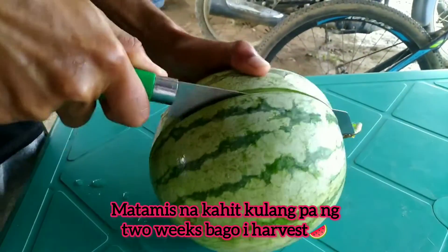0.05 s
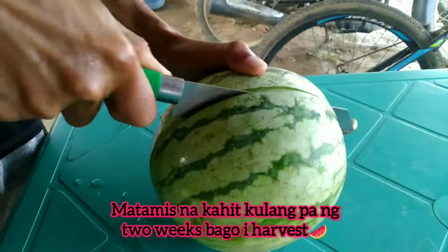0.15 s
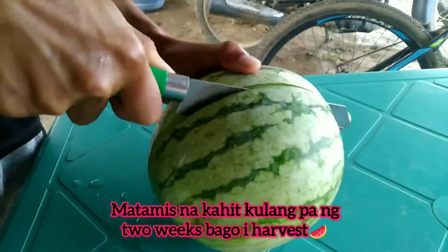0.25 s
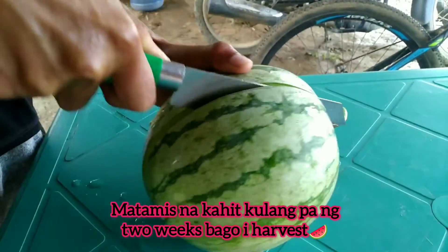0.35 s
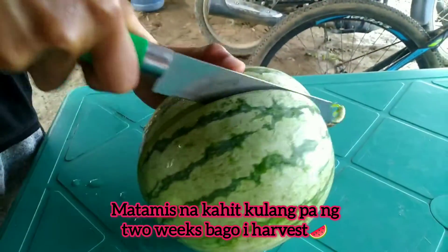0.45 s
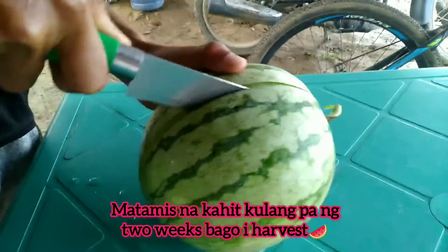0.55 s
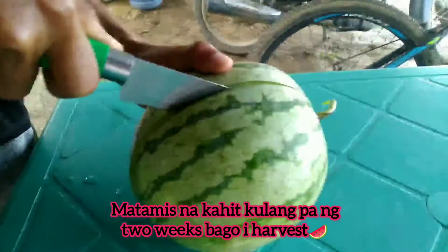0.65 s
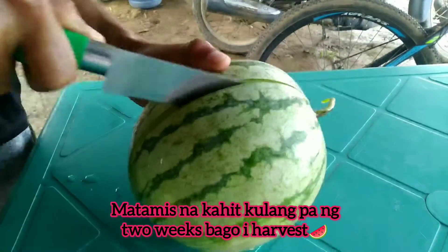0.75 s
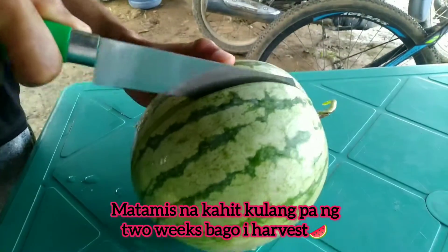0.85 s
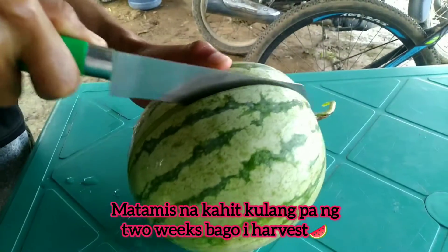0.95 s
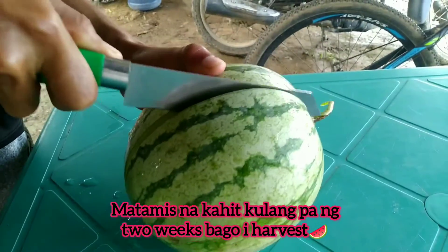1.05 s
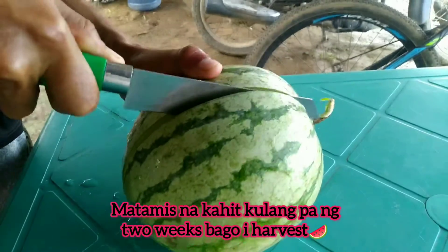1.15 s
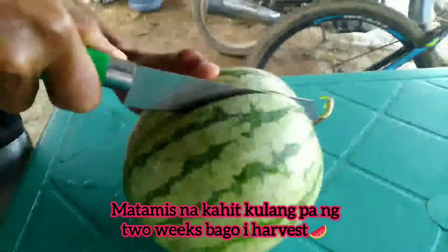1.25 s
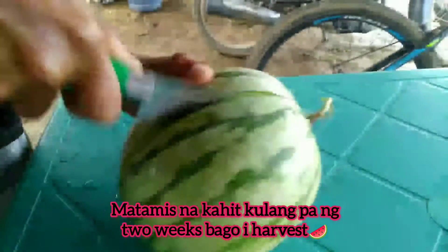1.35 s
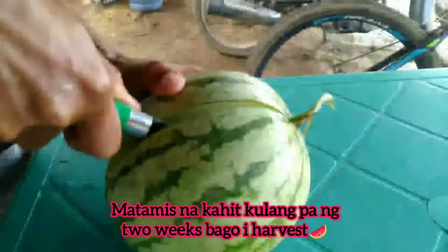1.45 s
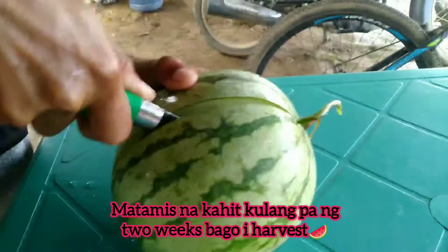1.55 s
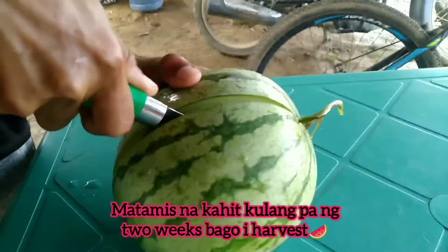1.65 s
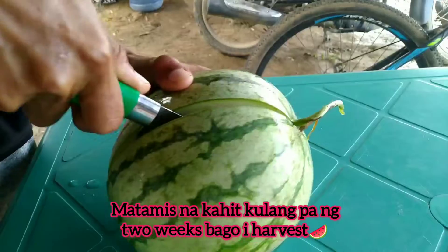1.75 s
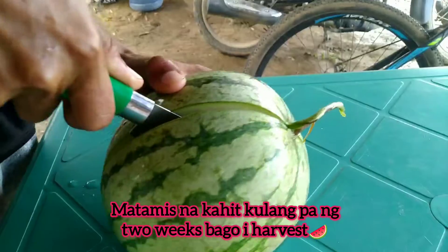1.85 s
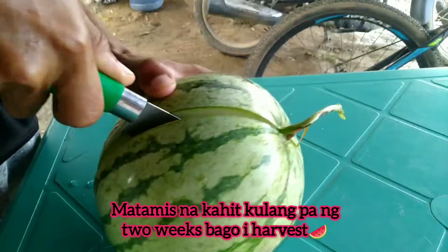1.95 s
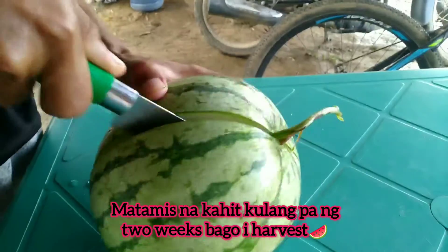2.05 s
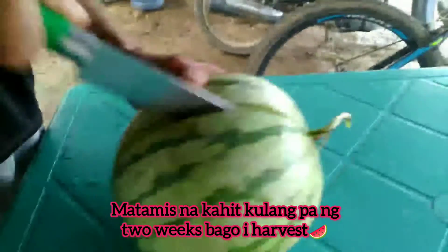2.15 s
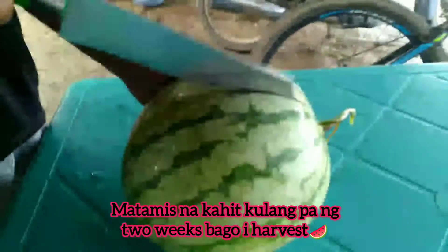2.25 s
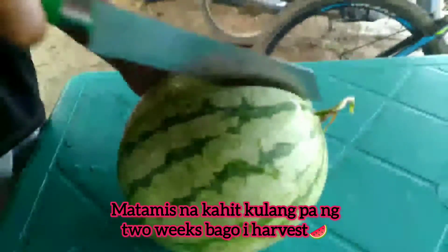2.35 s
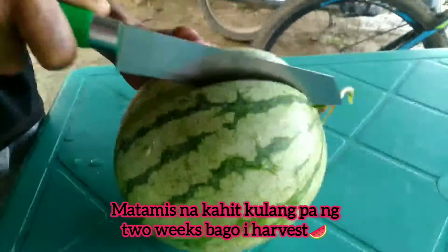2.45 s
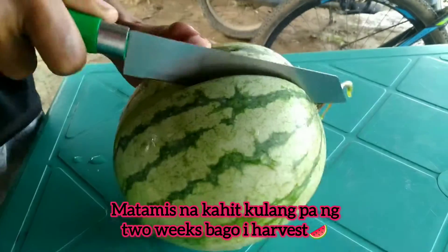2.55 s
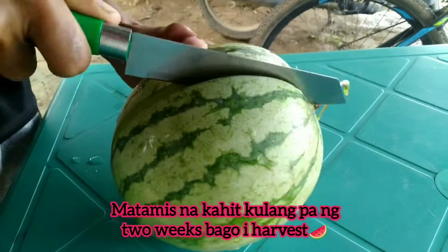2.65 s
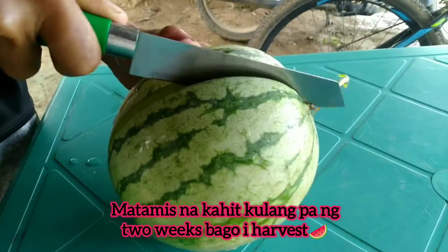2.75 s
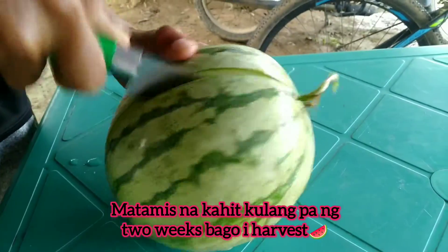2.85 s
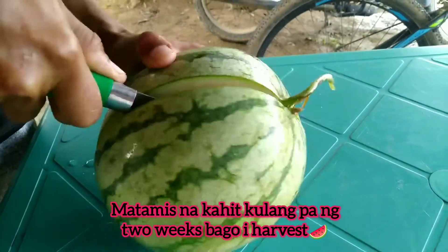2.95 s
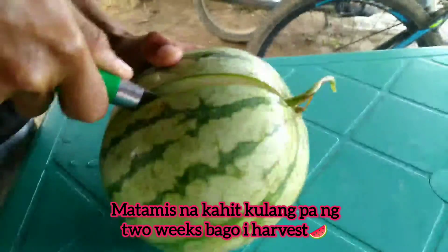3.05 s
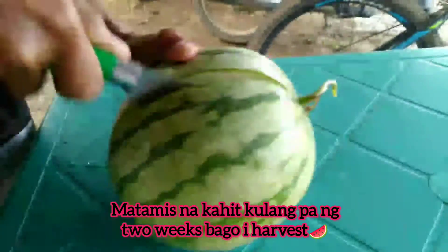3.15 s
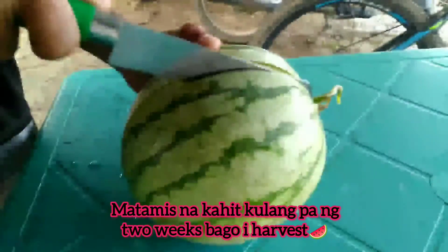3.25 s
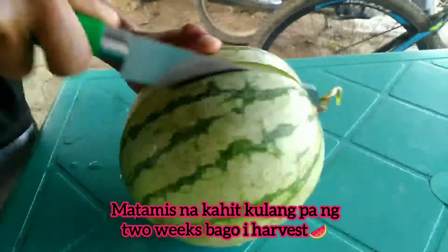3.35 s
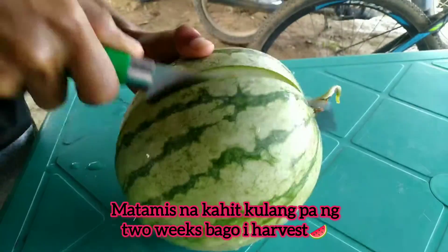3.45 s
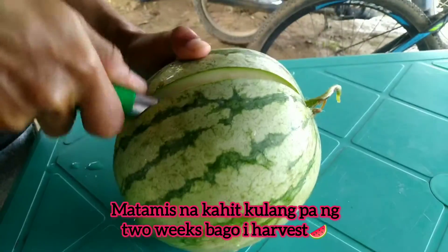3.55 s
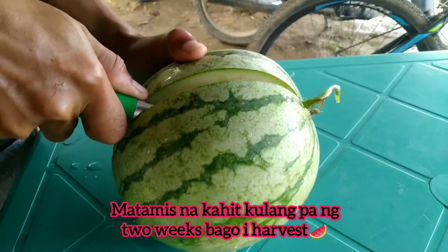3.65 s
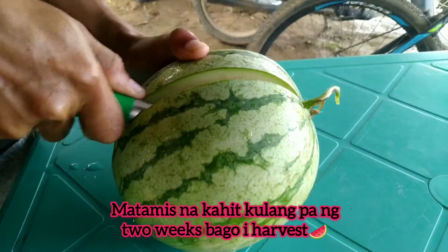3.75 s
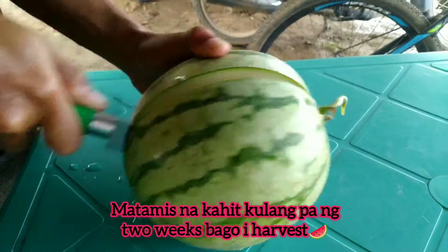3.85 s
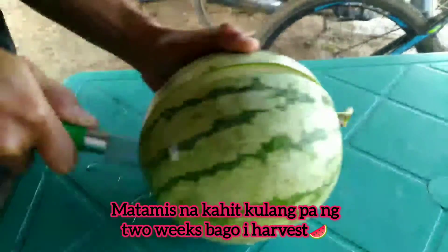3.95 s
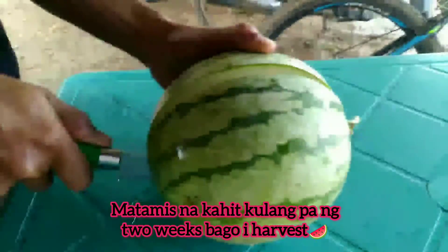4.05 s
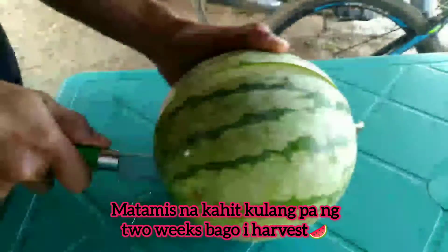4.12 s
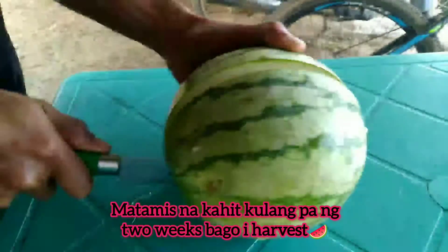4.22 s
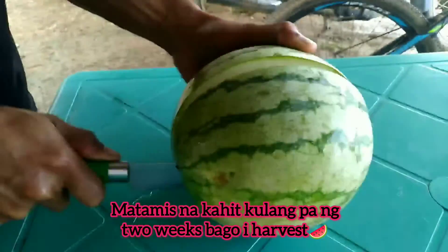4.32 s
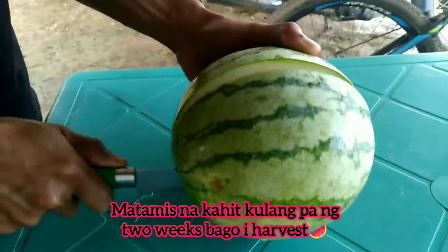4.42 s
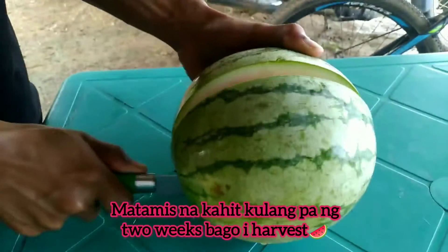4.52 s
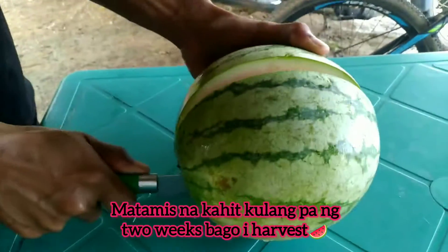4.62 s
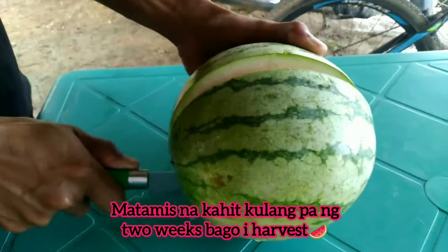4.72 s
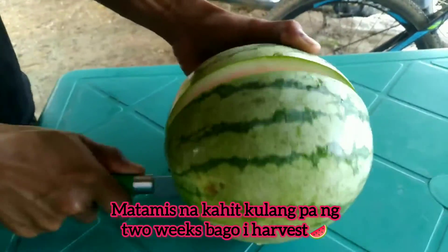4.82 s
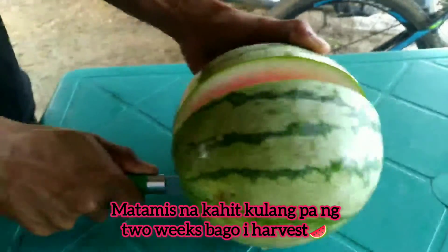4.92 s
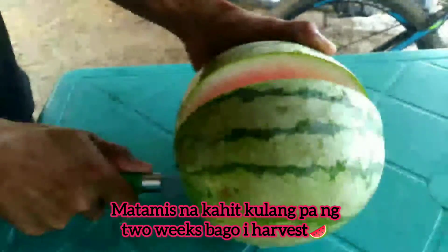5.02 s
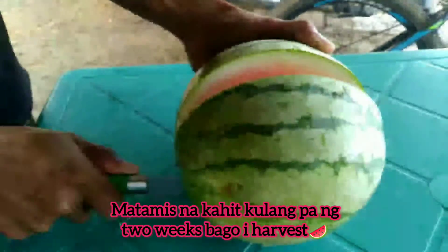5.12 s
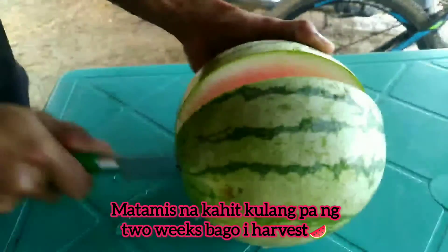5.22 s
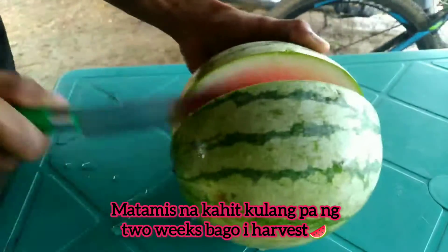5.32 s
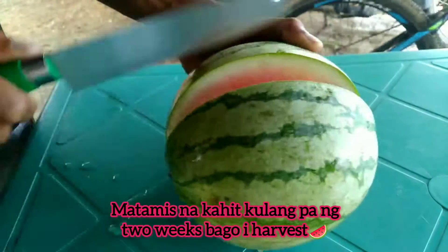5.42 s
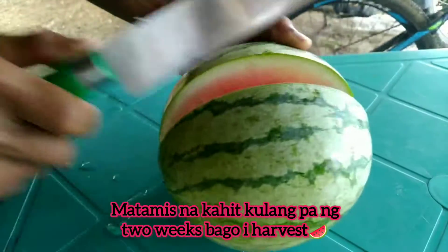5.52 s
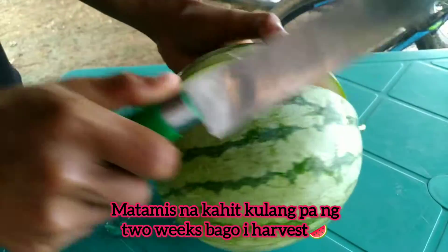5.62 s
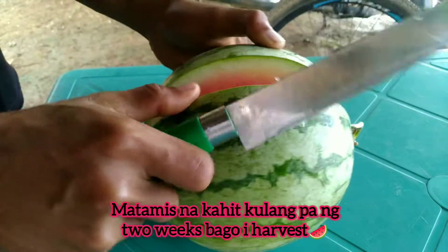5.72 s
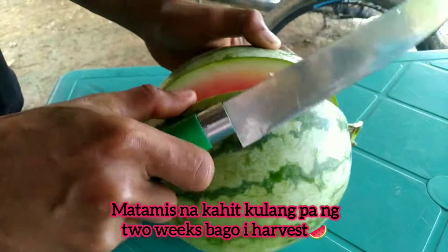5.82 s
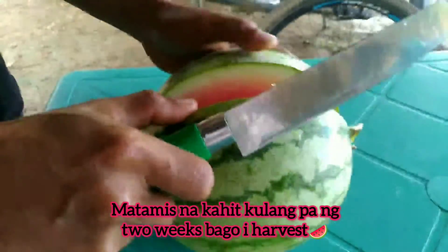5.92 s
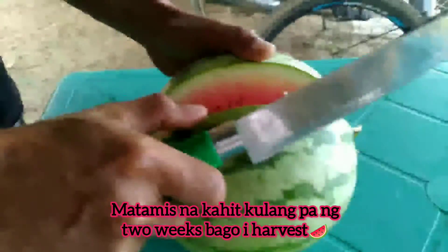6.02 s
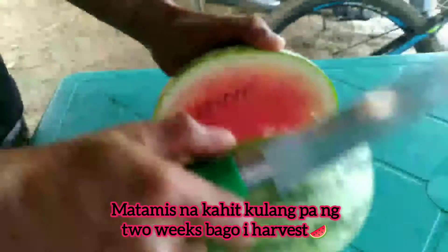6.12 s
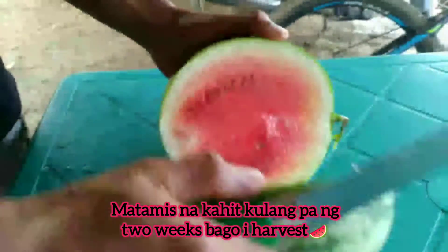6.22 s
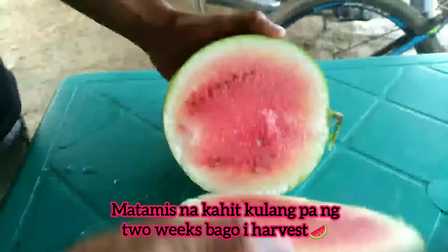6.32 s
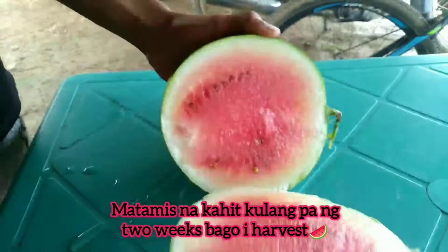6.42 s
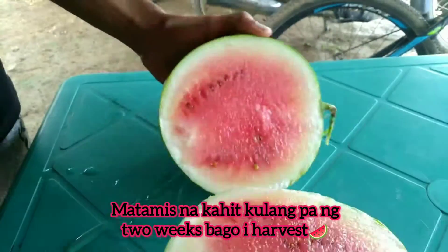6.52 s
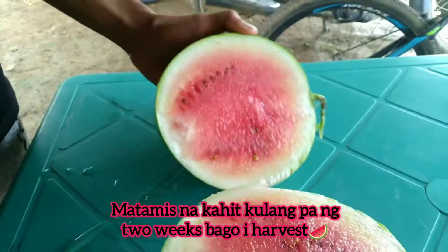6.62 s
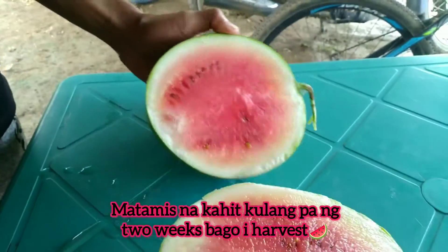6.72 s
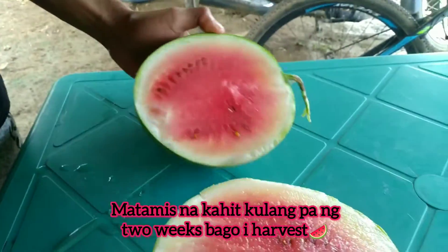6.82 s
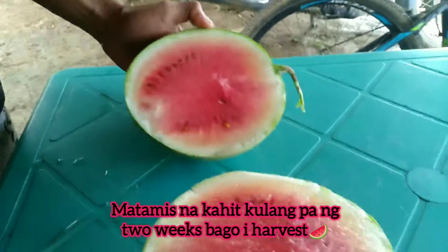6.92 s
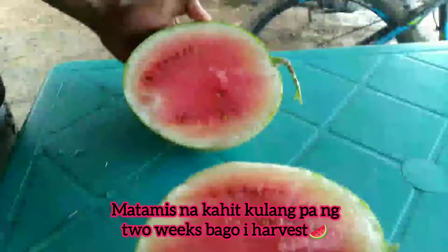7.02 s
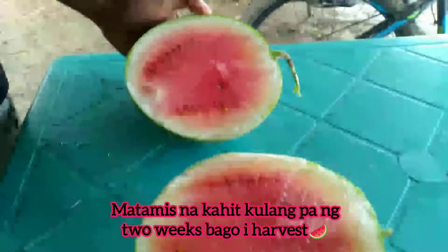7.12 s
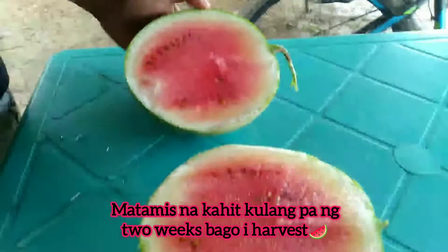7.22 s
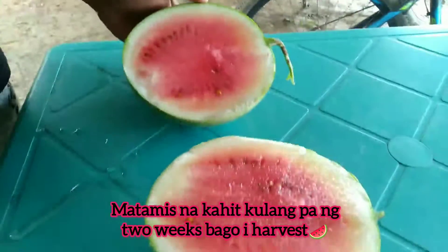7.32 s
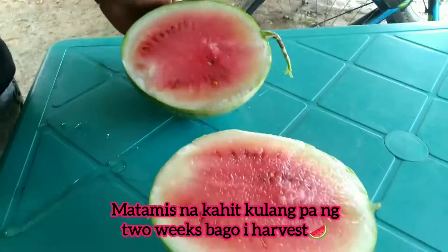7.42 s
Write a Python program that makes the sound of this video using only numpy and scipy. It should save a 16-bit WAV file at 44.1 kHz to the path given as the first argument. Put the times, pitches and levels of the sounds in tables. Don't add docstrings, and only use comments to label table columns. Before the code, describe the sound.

Close up under an open shelter, a knife saws lightly through a watermelon with faint ticks and wet rasps. A sharp crack and hollow thump come early, another juicy tear follows midway, then slower creaking crackles. Near the end the fruit splits in the loudest dense burst of snaps and low thuds, leaving a few tiny ticks. A small engine idles steadily in the distance under faint air hiss.

```python
import sys
import numpy as np
from scipy import signal
from scipy.fft import rfft, irfft, next_fast_len
from scipy.io import wavfile

SR = 44100
rng = np.random.default_rng(int(sys.argv[2]) if len(sys.argv) > 2 else 0)


def voltage_ratio(decibels):
    exponent = np.asarray(decibels, float) / 20
    return 10 ** exponent


def dump_mix(stems):
    frames = np.atleast_2d(stems).T
    limited = np.clip(frames, -1, 1)
    pcm = np.round(limited * 32767).astype(np.int16)
    wavfile.write(sys.argv[1], SR, pcm)


N = 329418
T = np.arange(N) / SR

# frequency in Hz, level in dB, 60 dB decay in s.
FRUIT_MODES = [(108, 4, 0.18), (146.5, 2.5, 0.26), (184.5, 1.5, 0.13), (223.6, -2, 0.11), (259, -10.5, 0.1),
               (320, -4.5, 0.25), (371, -20, 0.18)]
# time in s, crack in dB, tick in dB, left-right balance in dB.
RIND_CRACKS = [(1.3348, -36, -28, -5), (1.397, -38, -31, -10), (1.4065, -28.5, -32, -15),
               (2.8685, -56, -25, -4.5), (2.878, -56, -23, -7), (2.932, -35, -30, -5),
               (2.941, -30.5, -31, 2), (4.9213, -34, -43, -0.5), (4.9745, -38, -36, 2),
               (6.0415, -28, -38, -5), (6.048, -36, -42, 0), (6.0687, -27, -19, 0),
               (6.0954, -25.5, -21.5, -2), (6.1148, -26, -32, -3), (6.1414, -28, -38, -3),
               (6.1707, -27.5, -41, 4), (6.2311, -30.5, -42, -1), (6.264, -40, -44, 2),
               (6.2912, -42, -42, 1)]


def unit_rms(x):
    return x / np.sqrt(np.mean(x ** 2) + 1e-20)


def in_time(rows):
    s, *columns = np.transpose(rows)
    return [np.interp(T, s, c) for c in columns]


def at_hz(points, size):
    hz, value = np.transpose(points)
    bins_hz = np.arange(size // 2 + 1) * SR / size
    return np.interp(np.log(bins_hz + 1), np.log(hz), value)


def colour(x, points):
    size = next_fast_len(N + SR // 4) // 2 * 2
    cepstrum = irfft(np.log(voltage_ratio(at_hz(points, size))), size)
    cepstrum[1:size // 2] *= 2
    cepstrum[size // 2 + 1:] = 0
    return irfft(rfft(x, size) * np.exp(rfft(cepstrum)), size)[..., :N]


def two_ports(mid, side, likeness):
    size = next_fast_len(N)
    alike = np.clip(at_hz(likeness, size), 0, .995)
    shared = np.sqrt(1 + alike) * rfft(mid, size)
    own = np.sqrt(1 - alike) * rfft(side, size)
    return irfft(np.array([shared + own, shared - own]), size)[:, :N] / np.sqrt(2)


def cut(x, hz, kind, order=2):
    return signal.sosfilt(signal.butter(order, hz, kind, fs=SR, output="sos"), x)


def drift(rate_hz):
    r = np.exp(-80 * np.pi * rate_hz / SR)
    noise = rng.standard_normal(N // 40 + 2002)
    slow = signal.lfilter([1], [1, -2 * r, r * r], noise)[2000:]
    return np.interp(np.arange(N) / 40, np.arange(len(slow)), unit_rms(slow))


def resonance(x, hz, width_hz):
    r = np.exp(-np.pi * width_hz / SR)
    poles = [1, -2 * r * np.cos(2 * np.pi * hz / SR), r * r]
    return signal.lfilter([(1 - r * r) / 2, 0, (r * r - 1) / 2], poles, x)


def air():
    # frequency in Hz, spectral level in dB per Hz.
    hiss_spectrum = [(600, -14.5), (1000, -12), (2200, -7.5), (3600, -14), (5500, -14), (7000, -24),
                     (8100, -25.5), (8800, -19.5), (9600, -14.5), (11500, -12.5), (13500, -17),
                     (15200, -14), (15700, -45), (16500, -59)]
    hiss = unit_rms(colour(rng.standard_normal((2, N)), hiss_spectrum))
    return voltage_ratio(-63.5 + 0.3 * drift(0.96)) * hiss


def engine():
    # time in s, firings per s.
    firing = [(0, 20.1), (.5, 20.4), (1.2, 19.7), (2.1, 19.8), (3.5, 19.1), (4.2, 18.7), (5.2, 18.3),
              (5.8, 18.3), (6.3, 18.9), (7.47, 19.1)]
    # time in s, loudness in dB, level of the fourth order (uneven firing) in dB.
    idle = [(0, 0.13, 8), (.8, 1.1, 4.5), (2, 2.3, -14), (2.7, 0.46, 7.5), (3.4, 0.77, -11),
            (4.1, -1.8, 2.5), (5.2, -0.21, 0.5), (6.8, -1.4, 1), (7.47, -1.3, 4)]
    # order of the firing rate, rms level in dB.
    orders = [(2, -58), (3, -52), (4, -55), (5, -57), (6, -58), (7, -68), (8, -67.5)]
    # frequency in Hz, width in Hz, level in dB.
    pipe_modes = [(432, 47, -6), (645, 69, 7), (785, 43, -4.5), (1155, 39, -2.5)]
    # frequency in Hz, spectral level in dB per Hz.
    rumble_spectrum = [(15, -46), (25, -10), (39, -5), (80, -2), (124, -14), (205, -10.5), (276, -17),
                       (441, -13), (535, -20.5), (694, -20), (1600, -33.5), (2080, -48), (3520, -120)]
    # frequency in Hz, left-right likeness from 0 to 1 (clipped).
    far_likeness = [(60, 1), (180, 0.8), (550, 0.76), (1650, -0.17), (4970, -6), (15000, 1)]
    (firing_hz,), (loud_db, uneven_db) = in_time(firing), in_time(idle)
    turns = np.cumsum(firing_hz) / SR
    lines = np.zeros(N)
    for k, db in orders:
        level_db = (uneven_db if k == 4 else loud_db) + db + 1.2 * drift(2.5)
        lines += voltage_ratio(level_db) * np.sin(2 * np.pi * (k * turns + rng.random()))
    puff_shape = 0.71 + np.exp(-3.0 * ((turns + .3) % 1)) * voltage_ratio(2.1 * drift(17))
    puff = puff_shape * rng.standard_normal((2, N))
    knock = unit_rms(sum(voltage_ratio(db) * resonance(puff, hz, width) for hz, width, db in pipe_modes))
    rumble = unit_rms(colour(rng.standard_normal((2, N)), rumble_spectrum)) * voltage_ratio(0.62 * drift(2.3))
    diffuse = voltage_ratio(-60 + loud_db) * knock + voltage_ratio(-54) * rumble
    far = np.sqrt(2) * lines + two_ports(*diffuse, far_likeness)
    return np.array([np.roll(far[0], 6), far[1]])


def insect():
    # time in s, level in dB.
    chirr = [
        (6.66, -96),
        (6.69, -72),
        (6.82, -70),
        (7.1, -78),
    ]
    s, db = np.transpose(chirr)
    line = resonance(resonance(rng.standard_normal((2, N)), 3640, 60), 3640, 60)
    level_db = np.interp(T, s, db, left=-120, right=-120) + 2.5 * drift(12)
    return voltage_ratio(level_db) * unit_rms(line)


def shelter(x):
    # delay in s, level in dB.
    echoes = [
        (.0062, -6.5),
        (0.0118, -14),
        (0.022, -15),
    ]
    out, dull = x.copy(), cut(x, 12500, "low", order=1)
    for delay, db in echoes:
        for side, stretch in enumerate((1, 1.03)):
            lag = round(delay * stretch * SR)
            out[side, lag:] += voltage_ratio(db) * dull[side, :-lag]
    return out


def bumps():
    # time in s,
    # peak in dB, pitch in Hz, 60 dB decay in s, slap relative to the peak in dB.
    contacts = [(1.405, -27, 323, 0.11, -6), (1.468, -31, 184.4, 0.21, -8), (1.613, -40.5, 194, 0.11, 7.5),
                (1.834, -45.5, 226, 0.23, -12.5), (2.1, -45.5, 211, 0.13, -3), (2.188, -42.5, 216, 0.14, -6),
                (2.305, -38.5, 209, 0.16, -12), (2.409, -42, 208, 0.22, -3), (2.901, -29.5, 320, 0.13, -2),
                (4.04, -50, 184, 0.099, -11), (4.298, -43.5, 298, 0.21, 11), (4.628, -41.5, 364, 0.085, 4.5),
                (4.925, -30, 167, 0.1, -14), (4.977, -31.5, 151, 0.097, -12), (4.5, -36.5, 199, 0.2, -10),
                (4.857, -34.5, 160, 0.078, 0), (5.33, -40, 183.4, 0.13, -17), (5.689, -50.5, 249, 0.13, -8),
                (6.298, -29.5, 208, 0.16, -12), (6.823, -36, 380, 0.05, 0),
                (1.487, -24, 85, 0.11, 2.5), (6.12, -28, 103, 0.16, -16), (6.157, -26, 108, 0.14, 0),
              (6.072, -30, 187, .35, -20), (6.098, -31, 226, .3, -20), (6.1, -33, 255, .3, -20),
              (6.116, -29, 146, .35, -20), (6.145, -27, 101, .35, -20), (2.88, -36, 228, .3, -20),
              (2.935, -33, 400, .07, -6), (4.93, -37, 187, .3, -20), (4.925, -38, 226, .3, -20),
              (4.51, -42, 229, .3, -20), (1.47, -39, 148, .25, -20)]
    length = SR // 3
    ring, slap, age = np.zeros(N + SR), np.zeros(N + SR), np.arange(length) / SR
    rise = 1 - np.exp(-age / 0.0027)
    for s, db, hz, t60, slap_db in contacts:
        i = round(s * SR)
        mode = np.sin(2 * np.pi * hz * age)
        ring[i:i + length] += rise * voltage_ratio(db - 60 * age / max(t60, .02)) * mode
        noise = rng.standard_normal(length)
        slap[i:i + length] += rise * voltage_ratio(db + slap_db + 3.5 - 60 * age / 0.075) * noise
    return (ring + cut(slap, [60, 900], "band"))[:N]


def thud(thud_db):
    shake = voltage_ratio(thud_db) * voltage_ratio(3.95 * drift(45)) * rng.standard_normal((2, N))
    modes = 0
    for k, (hz, db, t60) in enumerate(FRUIT_MODES):
        modes = modes + voltage_ratio(db) * resonance(shake[k % 2], hz, 1.9 / t60)
    return voltage_ratio(19.5) * modes


def pops():
    # time in s, peak
    # in dB, pitch in Hz, 60 dB decay in s.
    bursts = [(0.164, -45, 2000, 0.008), (0.222, -42, 1700, .02), (0.247, -44, 1300, .02),
              (0.7963, -36, 5300, .007), (0.8005, -42, 4400, .012), (1.3352, -25, 4400, 0.006),
              (1.336, -37, 2400, 0.037), (1.403, -23.5, 1820, .025), (1.4055, -25, 800, .04),
              (1.396, -28, 3970, .015), (1.489, -37, 700, .03), (1.6132, -40, 1500, .012),
              (1.6135, -45, 3000, .01), (2.197, -34.5, 4600, 0.029), (2.878, -28.5, 1424, 0.025),
              (2.9, -31.5, 823, .05), (2.9335, -26, 848, 0.04), (2.9425, -25, 4670, 0.022),
              (4.5807, -40, 2340, .015), (6.0684, -26, 2360, 0.018), (6.0948, -26, 2300, .02),
              (6.1427, -24, 1100, 0.028), (6.171, -25, 1120, .03), (6.231, -28, 2380, .02),
              (6.0417, -13, 2200, 0.008), (6.732, -40, 2300, 0.011), (6.7712, -40, 5400, 0.005),
              (6.7946, -50, 2380, .02), (6.9424, -33, 2150, 0.009), (6.943, -38, 4600, .008),
              (6.9432, -37, 3000, .01), (6.7708, -31, 10800, .004), (6.732, -38, 9300, .006),
              (6.0418, -18, 3400, .005), (6.042, -20, 1200, .008), (6.0478, -26, 2200, .008),
              (6.0688, -15, 6500, .004), (6.0745, -19, 2300, .007), (6.0748, -17, 10500, .006),
              (6.0964, -19, 1800, .008), (6.102, -23, 2800, .007), (6.144, -23, 2400, .012),
              (6.238, -28, 2600, .01), (1.3358, -27, 3300, .005), (1.3362, -27, 5500, .005),
              (1.494, -31, 420, .03), (1.215, -50, 1800, .012), (2.8785, -29, 10200, .008),
              (2.9415, -25, 2600, .005), (1.784, -51, 1200, .01),
              (4.9214, -23, 2400, .006), (4.9213, -27, 5500, .004), (4.9214, -29, 10500, .005),
              (4.9214, -36, 15800, .004), (4.9275, -34, 5000, .012), (4.9746, -26, 10300, .005),
              (4.9746, -29, 2500, .005), (4.9746, -33, 5500, .004), (4.9746, -38, 15800, .004),
              (4.981, -40, 5500, .008), (4.926, -38, 700, .05), (4.98, -40, 700, .04),
              (0.2125, -44, 10000, .01), (0.2125, -50, 5500, .008), (0.2245, -33, 9300, .012),
              (0.2245, -33, 11800, .012), (0.165, -50, 3200, .05), (0.595, -46, 9800, .008),
              (0.595, -50, 7000, .006), (2.698, -46, 1600, .015), (2.732, -52, 10300, .08),
              (2.83, -55, 10300, .04), (6.0686, -16, 11500, .004), (6.0688, -28, 15800, .004),
              (6.0418, -32, 11000, .006), (6.172, -21, 2300, .008), (6.177, -25, 4800, .006),
              (6.1445, -25, 4600, .006), (6.265, -32, 1800, .01), (6.7725, -44, 5000, .012),
              (6.949, -48, 5800, .008), (6.949, -50, 9500, .008), (1.3352, -30, 11000, .005),
              (1.3352, -38, 15800, .004), (1.3985, -24, 3500, .005), (1.497, -42, 900, .03),
              (5.81, -52, 850, .03), (7.006, -52, 11000, .006), (6.0752, -21, 13000, .006),
              (6.1152, -21, 1700, .008), (6.1155, -24, 10500, .008), (6.0968, -22, 11500, .008),
              (2.943, -27, 4400, .008), (6.843, -44, 10500, .005), (1.6132, -44, 2200, .006),
              (0.7962, -40, 6300, .005), (1.28, -50, 700, .02), (5.586, -50, 800, .02)]
    out, age = np.zeros((2, N + 2000)), np.arange(2000) / SR
    rise = 1 - np.exp(-age / 0.00029)
    for s, db, hz, t60 in bursts:
        i = round(s * SR)
        rough = 1.9 * resonance(rng.standard_normal((2, 2000)), hz, hz / 3.2)
        ring = np.sin(2 * np.pi * hz * age) + rough
        out[:, i:i + 2000] += voltage_ratio(db - 60 * age / max(t60, .003)) * rise * ring
    return out[:, :N]


def snaps():
    # time in s, crack in dB, tick in dB, left-right balance in dB.
    fibres = [(0.1248, -55, -47, -2), (0.164, -42, -46, -1), (0.1905, -62, -43, -1), (0.222, -43, -30, -6),
              (0.2475, -42, -42, -1), (0.3097, -60, -54, 1), (0.542, -52, -59, 11), (0.5802, -70, -36, -7),
              (0.796, -50, -40, 0), (0.8005, -57, -34.5, -3), (1.293, -65, -44.5, -1),
              (2.1945, -60, -38, -3), (2.1969, -42, -26.5, -2), (2.2, -47, -30, -3), (2.6997, -59, -49, -1),
              (2.732, -71, -54, -7), (3.192, -49, -43, -4), (3.559, -60, -49, -1), (4.4944, -42, -36.5, -5),
              (4.508, -41, -32, -3), (4.5204, -46, -35, -10), (4.557, -53, -37, -5),
              (4.582, -40, -29.5, -5), (5.586, -60, -55, -1), (6.732, -56, -37, -5), (6.7514, -69, -43, -5),
              (6.7612, -70, -46, -3), (6.7707, -57, -30.5, -5.5), (6.7745, -60, -41, -3),
              (6.78, -62, -43, -3), (6.817, -67, -46, -7), (6.822, -70, -49, -5), (6.8385, -70, -48, -5),
              (6.843, -65, -41.5, -7), (6.854, -70, -51, -2), (6.8635, -70, -50, -5),
              (6.888, -61, -49, -2.5), (6.942, -45, -63, 0), (6.95, -59, -50, -1)]
    crack_t60, tick_t60 = 0.0074, 0.013
    crack, tick, push = np.zeros((2, N + 2000)), np.zeros((2, N + 2000)), np.zeros(N)
    age = np.arange(2000) / SR
    rise = 1 - np.exp(-age / 0.00027)
    for k, (s, crack_db, tick_db, pan_db) in enumerate([*fibres, *RIND_CRACKS]):
        noise = rng.standard_normal((4, 2000)) * rise
        fall = 60 * age / (0.66 if k < len(fibres) else 1)
        i, pan = round(s * SR), voltage_ratio(np.array([[pan_db / 2], [-pan_db / 2]]))
        crack_noise = noise[0] + 0.89 * noise[1:3]
        crack[:, i:i + 2000] += pan * voltage_ratio(crack_db - fall / crack_t60) * crack_noise
        tick[:, i:i + 2000] += pan * voltage_ratio(tick_db - fall / tick_t60) * noise[2:]
        push[i] = voltage_ratio(1.51 * crack_db + 8.5)
    mid = voltage_ratio(14.5) * cut(crack, [1200, 4200], "band")
    treble = voltage_ratio(8.0) * cut(cut(tick, 7070, "high", order=4), 12500, "low", order=1)
    bright = mid + treble
    notch = resonance(bright, 7940, 1950)
    knock = sum(voltage_ratio(db) * resonance(push, hz, 3.35 / t60) for hz, db, t60 in FRUIT_MODES)
    return (bright - 0.9 * notch)[:, :N] + voltage_ratio(41.0) * knock


def splits():
    out, age = np.zeros((2, N + 4000)), np.arange(4000) / SR
    envelope = voltage_ratio(-60 * age / 0.036) * (1 - np.exp(-age / 0.001))
    for s, crack_db, *_ in RIND_CRACKS:
        i, noise = round(s * SR), rng.standard_normal((3, 4000))
        out[:, i:i + 4000] += voltage_ratio(crack_db) * envelope * (noise[0] + 0.24 * noise[1:])
    return voltage_ratio(8.5) * cut(out, [590, 2740], "band")[:, :N]


def effort():
    # peak in s, rise by 20 dB in s, fall by 20 dB in s, tearing in dB, wetness in dB.
    slices = [(0.02, 3, 0.3, -68, 2), (0.238, 0.06, 0.08, -51, 3), (0.42, 0.5, 0.4, -69.5, -1),
              (0.52, 0.1, 0.36, -63, 2), (0.638, .1, 0.12, -60, 9), (0.86, 0, 0.23, -70, 6),
              (2.02, 0.45, 0.56, -64, -1.5), (2.13, 0.03, 0.24, -60.5, 5),
              (2.205, 0.0236, 0.0646, -53.5, 6.5), (2.745, 0.4, 0.2, -69, 2.5),
              (3.206, 0.1, -0.2, -62.5, 1.5), (3.929, 0.07, 0.15, -51.5, 3), (4.05, 0.14, 0.2, -51, 0.5),
              (4.2, 0.21, 0.23, -55, 2), (4.301, 0.08, 0.09, -48.5, -4.5), (4.42, .15, .15, -62, -3),
              (5.3, 0.25, 0.21, -60.5, -2), (6.8, 0.33, 0.32, -59, -11)]
    # peak in s, rise by 20 dB in s, fall by 20 dB in s, tearing in dB, wetness in dB.
    prises = [
        (1.404, 0.022, 0.075, -29.5, 1),
        (2.89, 0.019, 0.069, -38, 0),
        (2.939, 0.061, 0.055, -35, -0.5),
        (3.62, 0.066, 0.058, -58.5, -1.5),
        (4.519, 0.087, 0.13, -43.5, -0.5),
        (4.88, 0.07, 0.18, -54, -3.5),
        (4.981, 0.07, 0.043, -52, 1.5),
        (6.108, 0.04, 0.094, -30, 0.5),
        (6.175, 0.1, 0.13, -35, 1.5),
        (6.29, 0.12, 0.03, -48, 2.5),
    ]
    # time in s, fall by 20 dB in s, tearing in dB, wetness in dB, extra weight in dB.
    gives = [
        (0.799, 0.08, -57, 8, -8),
        (1.337, 0.06, -47, 3, 3),
        (1.613, 0.05, -53.5, -32, 4.5),
        (2.693, 0.05, -55, -8, -6),
        (2.869, 0.0737, -37, 3, 5),
        (3.558, 0.19, -51.5, -5, -1.5),
        (3.868, 0.2, -50, 2.5, -5.5),
        (4.9232, 0.03, -44, 0, 10),
        (6.044, 0.04, -37, -8, -2),
        (6.07, 0.0167, -32, -5, -7),
    ]
    rounding = 1.405
    rows = [(*row, -6, rounding) for row in slices]
    rows += [(*row, 2.5, rounding) for row in prises]
    rows += [(s, .002, *rest, 1) for s, *rest in gives]
    s, rise, fall, db, wet_db, weight_db, bend = np.transpose(rows)[:, :, None]
    coarse = T[::32]
    away = np.maximum((s - coarse) / rise, (coarse - s) / np.maximum(fall, .01))
    loss = np.minimum(20 * away ** bend, 80)
    bright = db - (1 + 0.3 * (coarse > s)) * loss
    push_db = -44 + 0.52 * (db + 48.5) + weight_db - 0.71 * loss
    layers = [db - loss, bright + wet_db, bright - 0.5 + wet_db, push_db]
    totals = [10 * np.log10(np.sum(voltage_ratio(2 * v), axis=0)) for v in layers]
    tear, fizz, sizzle, push = [np.interp(T, coarse, total) for total in totals]
    return tear, fizz - tear, sizzle - tear, push


def tearing(tear_db, fizz_db, sizzle_db):
    # frequency in Hz, spectral level in dB per Hz.
    flesh_spectrum = [(260, -32.5), (450, -14.5), (672, 2.5), (988, -8), (1130, 0), (1350, -3), (2340, 1),
                      (3590, -5.5), (6310, -8), (8120, -24.5), (9700, -5.5), (12300, -13.5), (15600, -11)]
    # frequency in Hz, left-right likeness from 0 to 1.
    near_likeness = [(60, 0.99), (180, 0.46), (550, 1), (1650, 0.052), (4970, 0.16), (15000, 0.069)]
    sizes = voltage_ratio(np.minimum(rng.exponential(1, N), 5) + 1.2 * drift(64))
    bursting = rng.random(N) < 0.6
    clicks = sizes * bursting * rng.standard_normal((2, N)) + 1e-18
    pitches = np.geomspace(450, 15000, 22)
    odds = pitches / pitches.sum()
    dealt = np.searchsorted(np.cumsum(odds), rng.random(N))
    cells = 0
    for k, hz in enumerate(pitches):
        patch = voltage_ratio(2.0 * drift(10.8)) / np.sqrt(odds[k])
        cells = cells + patch * resonance(clicks * (dealt == k), hz, hz / 5.1)
    flesh = colour(two_ports(*cells, near_likeness), flesh_spectrum)
    dull = unit_rms(cut(flesh, 3300, "low", order=4))
    fizz = unit_rms(cut(flesh, [4000, 8000], "band", order=3))
    sizzle = unit_rms(cut(flesh, 9700, "high", order=4))
    return voltage_ratio(tear_db) * (dull + voltage_ratio(fizz_db) * fizz + voltage_ratio(sizzle_db) * sizzle)


def gaps(x):
    # frequency in Hz, share of thin bands lost from 0 to 1.
    gap_odds = [(1000, 0.02), (2500, 0.065), (4000, 0.07), (5000, 0.07), (6000, 0.15), (8000, 0.6),
                (9500, 0.13), (12500, 0.12), (15000, 0.3)]
    hz, s, frames = signal.stft(x, SR, nperseg=2048)
    bins, steps = frames.shape[1:]
    band = (40 * np.log(1 + hz / 3000)).astype(int)
    draw = rng.random((bins, steps // 2 + 1)).repeat(2, axis=1)[band, :steps]
    lost = draw < (at_hz(gap_odds, 2048) * (hz > 1500))[:, None]
    return signal.istft(frames * np.where(lost, voltage_ratio(-40.0), 1), nperseg=2048)[1][:, :N]


def dropouts(x):
    # start in s, end in s, lower edge in Hz, upper edge in Hz.
    losses = [(2.866, 2.908, 2900, 3850), (2.71, 2.76, 3150, 3800), (4.47, 4.56, 3850, 4150),
              (2.1, 2.14, 6700, 7600), (6.737, 6.745, 5000, 7800), (6.753, 6.758, 4800, 9000),
              (6.784, 6.79, 4500, 8000), (4.947, 4.97, 6900, 8600), (1.42, 1.47, 4250, 4500),
              (6.2, 6.27, 3950, 4250), (6.1, 6.2, 6800, 7100), (6.13, 6.22, 7500, 7800),
              (6.1, 6.19, 8100, 8500), (6.2, 6.3, 7600, 8100), (2.89, 2.94, 7900, 8500)]
    edge_s = .004
    out = x.copy()
    for start, end, low, high in losses:
        i, j = round(start * SR) - 400, round(end * SR) + 400
        sections = signal.butter(4, [low, high], "band", fs=SR, output="sos")
        band = signal.sosfiltfilt(sections, out[:, i:j])
        inside = np.minimum(T[i:j] - start, end - T[i:j])
        out[:, i:j] -= np.clip(inside / edge_s + 1, 0, 1) * band
    return out


def scene():
    tear_db, fizz_db, sizzle_db, thud_db = effort()
    flesh = voltage_ratio(-1.0) * tearing(tear_db, fizz_db, sizzle_db)
    lasting = flesh + splits() + engine() + air()
    dulled = cut(gaps(lasting) + shelter(snaps()), 14840, "low", order=16)
    return dropouts(dulled + thud(thud_db) + bumps() + pops() + insect())


def top_cut(x):
    return signal.sosfilt(signal.butter(12, 16660, fs=SR, output="sos"), x)


def record(dry):
    # frequency in Hz, left-right balance in dB.
    port_balance = [(60, -2), (110, -3.5), (200, -1.5), (380, -2.5), (700, 0.5), (1290, 0), (2380, 0),
                    (4400, 2), (8120, -4), (15000, -6)]
    tilt = np.array(port_balance) * [1, .5]
    ports = np.array([colour(dry[0], tilt), colour(dry[1], tilt * [1, -1])])
    mix = cut(cut(ports, 16250, "low", order=24), 46, "high")
    return top_cut(mix)


dry = scene()
out = record(dry)
dump_mix(out)
```